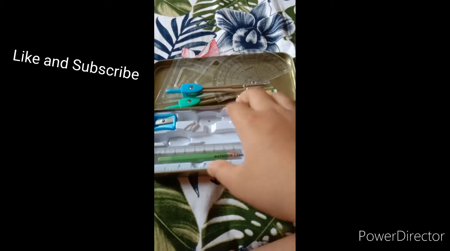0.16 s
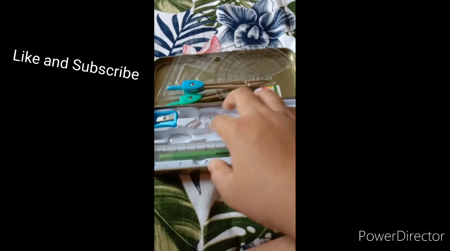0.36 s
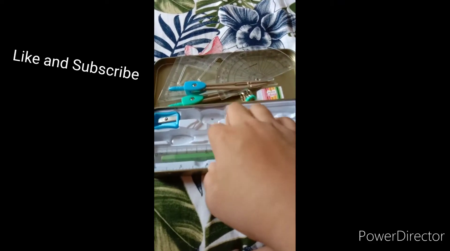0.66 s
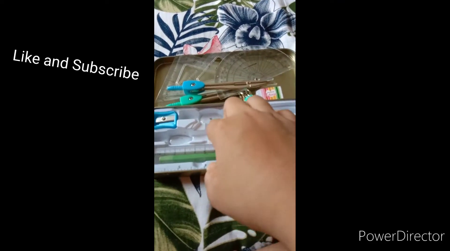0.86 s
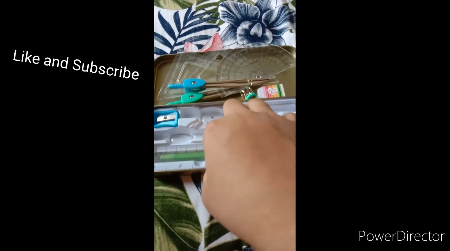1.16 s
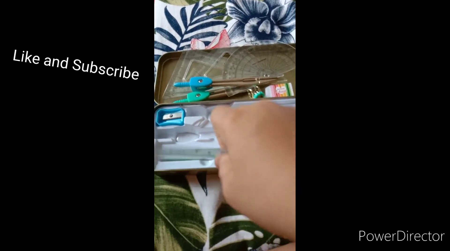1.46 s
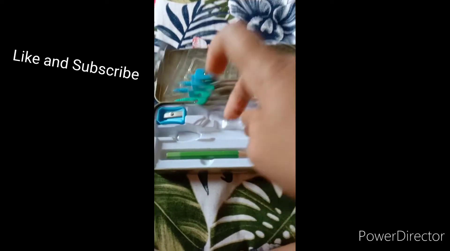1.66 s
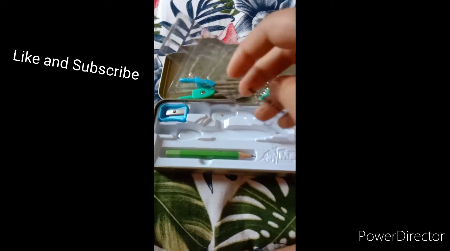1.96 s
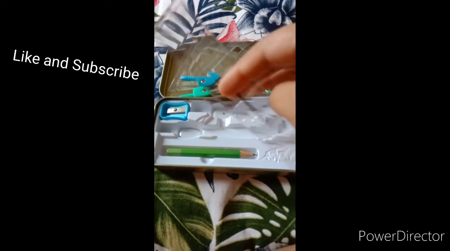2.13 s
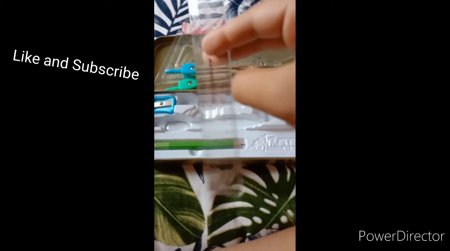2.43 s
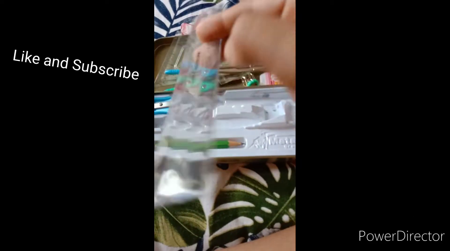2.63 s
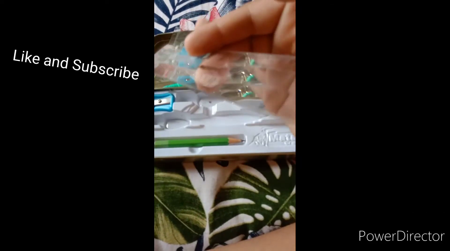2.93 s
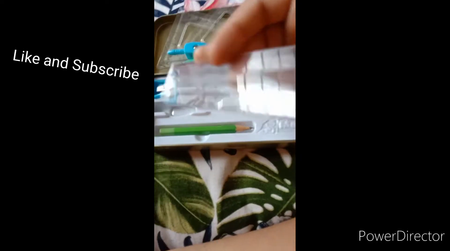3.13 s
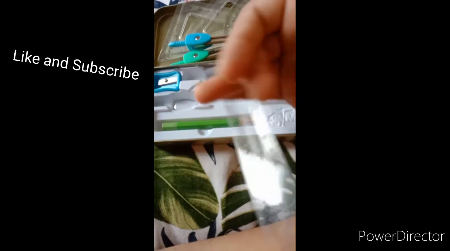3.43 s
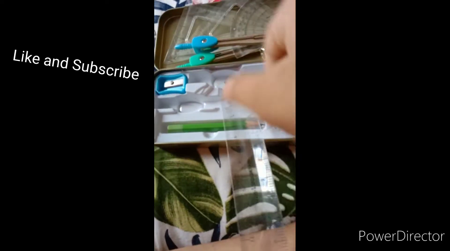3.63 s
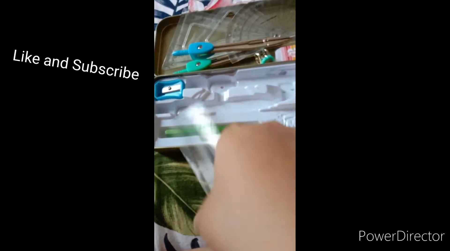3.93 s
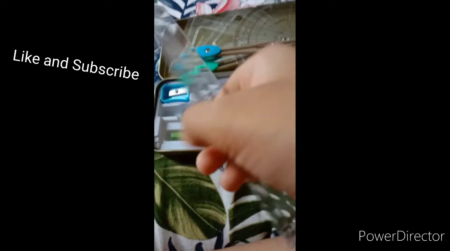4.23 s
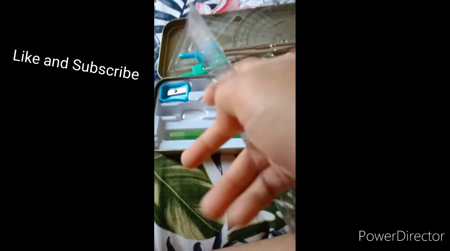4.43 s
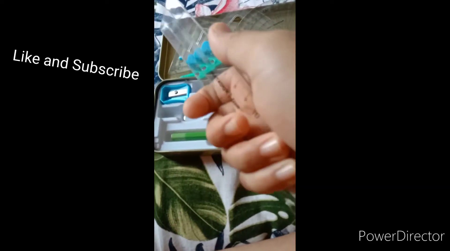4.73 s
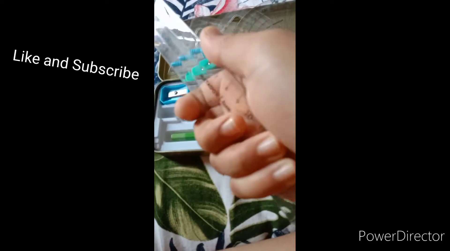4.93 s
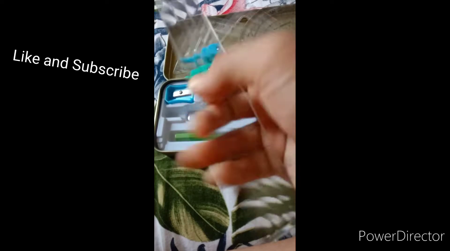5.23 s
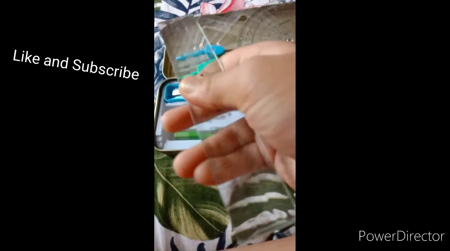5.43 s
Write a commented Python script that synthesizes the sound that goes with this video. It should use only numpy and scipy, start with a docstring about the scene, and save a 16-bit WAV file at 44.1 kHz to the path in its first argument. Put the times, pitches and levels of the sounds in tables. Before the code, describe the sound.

A plastic ruler is handled in a metal tin indoors, making scattered clicks, snaps and hissy rubs right by the microphone. It snaps loose from its tray early on, taps once, then clatters and scrapes in a louder burst, ending with a few soft ticks. Moving air thumps softly on the microphone, mostly in the first two thirds. Behind it, a quiet room drone wavers and faint far-off horns sound briefly.

```python
"""A plastic ruler snaps, taps and rubs as fingers pry it from the moulded tray of a metal tin and turn
it over close to a phone. Each contact is a brief force that excites the damped modes of ruler, tray
and tin; stick-slip friction on skin and tray drives the same modes more gently. Moving air buffets
the microphone, over a wavering room drone and faint far-off horn tones."""
import sys
import numpy as np
from scipy import signal
from scipy.io import wavfile
from scipy.ndimage import uniform_filter1d

SR = 44100
rng = np.random.default_rng(int(sys.argv[2]) if len(sys.argv) > 2 else 0)


def materialize(psi):
    """Save the field psi as 16-bit PCM at rate SR to the path in sys.argv[1].

    A 1-D psi becomes a single channel; in a 2-D psi each row is a channel.
    """
    bounded = np.clip(np.atleast_2d(psi).T, -1, 1)
    quanta = np.round(bounded * 32767).astype(np.int16)
    wavfile.write(sys.argv[1], SR, quanta)


N = 246519


def amp(db):
    """Decibels to amplitude ratio."""
    return 10 ** (np.asarray(db) / 20)


def unit_rms(x):
    """Normalisation to unit power."""
    return x / np.sqrt(np.mean(x ** 2) + 1e-20)


def smooth(x, samples):
    """Two moving averages in cascade: a low-pass filter."""
    return uniform_filter1d(uniform_filter1d(x, samples), samples)


def wander(samples):
    """Low-passed noise of unit power: a slow random modulator."""
    return unit_rms(smooth(rng.standard_normal(N), samples))


def at_frequency(rows, hz):
    """Interpolation on a logarithmic frequency axis."""
    row_hz, value = np.transpose(rows)
    return np.interp(np.log(hz + 1), np.log(row_hz + 1), value)


def over_time(rows):
    """Linear interpolation at every sample."""
    return np.interp(np.arange(N) / SR, *np.transpose(rows))


def add(mix, start_s, sound):
    """Superposition of a sound on the mix."""
    part = mix[round(start_s * SR):][:len(sound)]
    part += sound[:len(part)]


def swells(rows, skew):
    """Sum of bell-shaped envelopes; a skew under 1 peaks early and fades slowly."""
    envelope = np.zeros(N)
    for middle_s, length_s, level_db in rows:
        progress = np.arange(round(length_s * SR)) / (length_s * SR)
        bell = np.sin(np.pi * progress ** skew) ** 2
        add(envelope, max(middle_s - length_s / 2, 0), amp(level_db) * bell)
    return envelope


def shape_spectrum(x, spectrum):
    """Minimum-phase filter of unit energy with the given spectrum."""
    hz = np.abs(np.fft.fftfreq(4096, 1 / SR))
    inside = (hz > spectrum[0][0]) & (hz < spectrum[-1][0])
    log_gain = np.where(inside, np.maximum(at_frequency(spectrum, hz), -70), -70) * np.log(10) / 20
    response = np.fft.ifft(np.exp(np.conj(signal.hilbert(log_gain)))).real[:2048]
    return signal.oaconvolve(x, response / np.linalg.norm(response))[:len(x)]


def patchy_noise(spectrum, fft_size, depth_db, frames, bins):
    """Coloured noise of unit power, modulated in random patches of time and frequency."""
    hz = np.fft.rfftfreq(fft_size, 1 / SR)
    real, imag, patches = rng.standard_normal((4 * N // fft_size + 5, len(hz), 3)).T
    patches = unit_rms(uniform_filter1d(uniform_filter1d(patches, bins, 0), frames, 1))
    patches = unit_rms(patches - uniform_filter1d(patches, 4 * bins, 0))  # broad bands stay level
    outside = (hz < spectrum[0][0]) | (hz > spectrum[-1][0])
    level_db = at_frequency(spectrum, hz) - 80 * outside
    spectra = (real + 1j * imag) * amp(level_db[:, None] + depth_db * patches)
    return unit_rms(signal.istft(spectra, nperseg=fft_size, noverlap=3 * fft_size // 4)[1][:N])


def resonate(x, hz, width_hz):
    """Forced response of a damped oscillator, with unit gain at resonance."""
    phasor = np.exp(2j * np.pi * hz * np.arange(len(x)) / SR)
    pole = np.exp(-np.pi * width_hz / SR)
    return 2 * (phasor * signal.lfilter([1 - pole], [1, -pole], x / phasor)).real


def modal_sum(x, modes, tuning=1, uneven_db=0):
    """Modal superposition, two resonators in cascade per mode; the contact point varies gain and pitch."""
    place, detune = rng.standard_normal((2, len(modes)))
    place_db = uneven_db * (place - place.mean())
    ratios = tuning * (1 + 0.018 * (uneven_db > 0) * detune)
    return sum(amp(db + offset_db) * resonate(resonate(x, hz * ratio, width), hz * ratio, width)
               for (hz, width, db), offset_db, ratio in zip(modes, place_db, ratios))


# Spectrum of the room drone: frequency_hz, relative_density_db
DRONE_SPECTRUM = [(100, -40), (170, -21.5), (353, -14.5), (555, -19), (690, -3), (830, -4.5), (996, -23.5),
                  (1310, -18.5), (2070, -37), (3530, -35.5), (3760, -39), (3950, -49.5), (6530, -42.5),
                  (8200, -60.5), (10700, -94), (18000, -120)]
# Envelope of the drone: time_s, relative_level_db
DRONE_LEVELS = [(0.0, -57.5), (0.11, -47.5), (0.4, -52.5), (0.87, -49), (2.02, -47), (2.19, -50),
                (3.33, -51.5), (3.56, -41.5), (4.0, -50.5), (4.3, -46.5), (4.8, -53.5), (5.59, -49.5)]
# Noise bands of a low boom and a thin hiss: centre_hz, width_hz, level_db
BOOM_BAND = (302.5, 89, -61)
HISS_BAND = (8780, 250, -86)


def room():
    """Amplitude-modulated noise: drone and boom waver over a steady hiss and microphone noise."""
    drone = patchy_noise(DRONE_SPECTRUM, fft_size=1024, depth_db=5, frames=10, bins=3)
    drone *= amp(4.5 + over_time(DRONE_LEVELS))
    boom_swell = amp(5.7 * wander(4000))
    boom, hiss = (amp(band[2]) * unit_rms(modal_sum(rng.standard_normal(N), [band]))
                  for band in (BOOM_BAND, HISS_BAND))
    drone_waver = amp(3.03 * wander(2500))
    return drone_waver * drone + boom_swell * boom + hiss + amp(-87) * rng.standard_normal(N)


# Far-off horn tones: start_s, length_s, pitch_hz, level_db
HORN_TONES = [(0, 0.13, 3324, -64.5), (0, 0.14, 3830, -66.5), (2.307, 0.4, 3700, -70.5),
              (3.135, 0.12, 3300, -64), (3.118, 0.17, 3794, -67.5), (3.655, 0.251, 3162, -54),
              (4.13, 0.16, 3275, -62.5), (4.438, 0.13, 2934, -69), (4.505, 0.12, 2020, -70.5),
              (4.707, 0.093, 3027, -69), (5.459, 0.128, 3385, -69), (5.513, 0.17, 2473, -61)]


def horns():
    """Only single overtones carry this far; each wavers as it beats with narrow-band noise."""
    out = np.zeros(N)
    for start_s, length_s, pitch_hz, level_db in HORN_TONES:
        t = np.arange(round(length_s * SR)) / SR
        fuzz = unit_rms(resonate(rng.standard_normal(len(t)), pitch_hz, width_hz=30))
        tone = np.sqrt(2) * np.sin(2 * np.pi * pitch_hz * t) + 0.7 * fuzz
        add(out, start_s, amp(level_db) * tone * signal.windows.tukey(len(t), 0.5))
    return out


# Spectrum of air buffeting the microphone: frequency_hz, relative_density_db
BUFFET_SPECTRUM = [(13, -60), (32, -25.5), (67, 1.5), (92, 8), (188, -11.5), (312, -22.5), (450, -35.5),
                   (990, -120)]
# Light draught between puffs: time_s, level_db
DRAUGHT_LEVELS = [(0, -59), (.4, -49.5), (1.1, -48), (1.5, -62), (3, -52), (3.5, -63), (4.1, -59.5),
                  (4.6, -68.5), (5.59, -70.5)]
# Strong puffs: middle_s, length_s, level_db
AIR_PUFFS = [(.52, 0.089, -34.5), (.62, 0.03, -22.5), (.83, 0.069, -31), (.97, 0.095, -21.5),
             (1.14, 0.14, -27.5), (1.8, 0.18, -40), (2.17, 0.19, -45), (2.55, 0.076, -33),
             (2.64, 0.098, -28.5), (2.74, 0.22, -32.5), (3.2, 0.094, -41.5), (3.66, 0.13, -34),
             (3.75, 0.11, -25), (3.85, 0.59, -41), (5.08, 0.19, -49), (5.42, 0.32, -40)]
GUST_DB, GUST_S = 4, 0.018  # depth and time scale of the draught's wandering


def air_buffeting():
    """Turbulent pressure at the microphone: low noise carried by a draught and by puffs."""
    flutter = patchy_noise(BUFFET_SPECTRUM, fft_size=2048, depth_db=5.5, frames=3, bins=3)
    flutter /= np.sqrt(smooth(flutter ** 2, 1300) + 0.048)  # evens out the short-term power
    draught = amp(over_time(DRAUGHT_LEVELS) + GUST_DB * wander(int(GUST_S * SR)))
    return (draught + swells(AIR_PUFFS, skew=0.96)) * flutter


# Decay of tin and room after a contact: frequency_hz, t60_s
DECAY_TIMES = [(700, 0.15), (1300, 0.2), (3000, 0.14), (6000, 0.068), (14000, 0.023)]


def reverberation(direct):
    """Sparse reflections of random sign decay exponentially, each band at its own rate."""
    hollow = resonate(direct, 1250, width_hz=270)
    reflected = direct - (1 - amp(-12)) * hollow  # the tray's knock is thrown back less
    echoes = np.zeros(SR // 2)
    arrivals = np.arange(200, len(echoes) - 20, 20)
    arrivals += rng.integers(0, 20, len(arrivals))
    echoes[arrivals] = rng.choice([-1., 1.], arrivals.shape)
    hz, t, spectra = signal.stft(echoes, SR, nperseg=256)
    decay = amp(-60 * t / at_frequency(DECAY_TIMES, hz)[:, None])
    tail = signal.istft(spectra * decay, SR, nperseg=256)[1]
    return signal.fftconvolve(reflected, tail / np.linalg.norm(tail))[:N]


# Modes of the tin's thin walls: pitch_hz, gain_db
WALL_MODES = [(2213, -10), (2700, -7), (3289, -6.5), (4786, -10.5), (5173, -14.5), (5443, -13.5),
              (6099, -9.5), (7058, -11.5)]


def tin_walls(direct):
    """Sympathetic resonance: the lightly damped walls ring on after each contact."""
    return sum(amp(db) * resonate(direct, hz, width_hz=9.5) for hz, db in WALL_MODES)


# Modes of tin, tray, bending ruler and ruler's edge: nominal_pitch_hz, width_hz, relative_gain_db
TIN_MODES = [(346, 87, -6.5), (444, 76, -3), (617, 220, 2)]
TRAY_MODES = [(1038, 460, -2), (1225.5, 252, 3.5), (1307, 150, -3.5)]
BENDING_MODES = [(2433, 220, 3.5), (2750, 300, -3.5), (3284, 250, 2.5), (3845, 130, 0.5)]
EDGE_MODES = [(4870, 290, 1), (5100, 300, 7.5), (5913, 320, 7.5), (5950, 260, 5), (6870, 230, 2.5),
              (7576, 200, -3), (9560, 200, -12)]
# Air under the tray, which makes the knock swell in: pitch_hz, width_hz
TRAY_CAVITY = (1210, 330)


def ruler_and_tin(thud, knock, clack, snap, tuning=1, uneven_db=0):
    """Forced vibration: four forces drive four sets of modes; tin and tray are too soft to pass treble."""
    tin = amp(19.5) * modal_sum(thud, TIN_MODES, 0.98, uneven_db)
    tray = amp(20.5) * modal_sum(resonate(knock, *TRAY_CAVITY), TRAY_MODES)
    bending = amp(15) * modal_sum(clack, BENDING_MODES, tuning, uneven_db)
    edge = amp(4.5) * modal_sum(snap, EDGE_MODES, tuning, uneven_db)
    low_pass = signal.butter(3, 2000, fs=SR)
    return signal.lfilter(*low_pass, tin + tray) + bending + edge


# Treble sizzle of rubs and taps: frequency_hz, relative_density_db
SIZZLE_SPECTRUM = [(5000, -18), (8500, -1), (11500, -5.5), (12400, -2), (12900, -9), (15000, 5.5),
                   (15700, -16.5), (16700, -46)]
# Strokes of the ruler on skin and tray: middle_s, length_s, level_db, sizzle_offset_db
RUB_STROKES = [(0.614, 0.053, -54, -13), (1.557, 0.25, -48.5, -10), (1.732, 0.054, -52.5, -9),
               (1.805, 0.36, -61, -23), (1.993, 0.073, -65, -1), (2.291, 0.13, -58, -1),
               (3.498, 0.13, -44.5, -3.5), (3.614, 0.11, -38.5, 0.5), (3.716, 0.34, -52, -18),
               (4.041, 0.075, -68.5, 9), (4.14, 0.15, -55.5, -7), (4.254, 0.052, -57.5, 0),
               (4.666, 0.04, -62, -18.5), (5.364, 0.14, -63, -13.5)]


def ruler_rubs():
    """Stick-slip friction: 2 ms slips of random strength excite the modes under a treble sizzle."""
    slip_db = 2.5 * np.minimum(rng.exponential(1, N // 90 + 1), 3.5)
    slips = unit_rms(amp(slip_db)).repeat(90)[:N]
    force_gains = amp([[-12], [-12], [-9], [4]])  # thud, knock, clack, snap
    skew = 0.59
    out = np.zeros(N)
    for middle_s, length_s, level_db, _ in RUB_STROKES:
        start = round((middle_s - length_s / 2) * SR)
        stroke = (slips * swells([(middle_s, length_s, level_db)], skew))[start:start + SR // 2]
        forces = rng.standard_normal((4, SR // 2))[:, :len(stroke)] * stroke * force_gains
        add(out, start / SR, ruler_and_tin(*forces, uneven_db=0.5))
    sizzle_rows = [(middle_s, length_s, db + offset) for middle_s, length_s, db, offset in RUB_STROKES]
    sizzle = patchy_noise(SIZZLE_SPECTRUM, fft_size=256, depth_db=9.5, frames=10, bins=6)
    return out + swells(sizzle_rows, skew) * slips * sizzle


# Taps and snaps of the ruler; offsets count from edge_db, and the grip sets the pitch ratio:
# start_s, edge_db, knock_db, sizzle_offset_db, pitch_ratio, contact_ms, bending_offset_db
RULER_CONTACTS = [(0.5714, -24.5, -22, -15, 0.99, 1.09, -7), (0.5788, -32.5, -28, -23, 0.9, 1.17, 0),
                  (0.5884, -26, -23, -28, 1.03, 1.2, -4.5), (0.8302, -46, -47, -12.5, 0.91, 1.5, -10),
                  (0.9114, -68, -33.5, -39, 0.79, 1.85, -9), (1.2424, -37, -43, -31, 1.01, 1.97, -8),
                  (1.2583, -45.5, -30, -26, 0.95, 1.83, -10), (1.4013, -40.5, -54, -24, 0.88, 0.74, -13.5),
                  (1.4416, -37, -44, -10.5, 0.9, 1, -14.5), (1.455, -17.5, -20, -11.5, 0.85, 1.95, -10.5),
                  (1.4755, -8, -12.5, -15, 0.98, 1.14, -11), (1.5008, -17, -18.5, -19.5, 0.96, 1.22, -13),
                  (1.6213, -32, -46, -12, 1, 1.61, -16), (2.2402, -17.5, -35, -25, 0.93, 1.16, -14.5),
                  (2.2441, -20.5, -33.5, -10, 1.07, 1.7, -9.5), (3.3493, -54, -61, -16, 1.13, 3, -13.5),
                  (3.439, -11.5, -4, -16, 0.93, 1.13, -7), (3.5338, -7.5, -13, -13, 0.9, 1.06, -7.5),
                  (3.537, -34, -19.5, -8, 1.1, 1.68, -3.5), (3.5481, -17, -18.5, -16, 1.2, 1.04, -13),
                  (3.5648, -12, -18, -8.5, 0.99, 1.14, -9), (3.571, -23, -19.5, -15, 1.063, 5.3, -5),
                  (3.6099, -26.5, -32.5, -3.5, 0.83, 1.4, -1.5),
                  (3.6587, -33.5, -30.5, -12.5, 1.02, 2.03, -5), (3.7396, -22, -44, -13.5, 1.01, 1.3, -10),
                  (4.0922, -22, -24.5, -22, 1.01, 1.38, 0), (4.0998, -34, -18, -11, 1.7, 1.27, -12),
                  (4.118, -29.5, -30.5, -8.5, 0.94, 2.1, -5), (4.4222, -28, -83, -24, 0.99, 1.02, -41.5),
                  (5.324, -42.5, -75, -31.5, 1.016, 2.05, -19), (5.35, -47.5, -78, -12, 1, 2.7, -32)]
BLOW_SHARE = 0.6  # share of a short contact that tin and tray feel as one blow
RATTLE_DB, RATTLE_DECAY_MS = -20, 9  # the loose ruler rattles on after each contact


def ruler_taps():
    """Impact excitation: each contact is an impulse within a burst of chatter, followed by a rattle."""
    out = np.zeros(N)
    t_ms = np.arange(3000) / SR * 1000
    for start_s, edge_db, knock_db, sizzle_db, pitch_ratio, contact_ms, bending_db in RULER_CONTACTS:
        progress = t_ms / (1.443 * contact_ms)
        push = (progress * np.exp(1 - progress)) ** 2
        strength = np.linalg.norm(push)
        forces = rng.standard_normal((5, len(t_ms))) * push  # thud, knock, clack, snap, sizzle
        forces *= strength / np.linalg.norm(forces, axis=1)[:, None]
        blow = strength * (np.arange(len(t_ms)) == np.argmax(push))
        share = BLOW_SHARE * min(2 / contact_ms, 1) ** 2  # long contacts grind rather than strike
        forces[:2] = (1 - share) * forces[:2] + share * blow
        forces[2:4] = (1 - share / 2) * forces[2:4] + share / 2 * blow
        rattle = amp(RATTLE_DB) * np.minimum(progress, 1) * np.exp(-t_ms / RATTLE_DECAY_MS)
        forces[2:] += rattle * rng.standard_normal((3, len(t_ms)))
        forces[:4] *= amp([[knock_db - 7], [knock_db], [edge_db + bending_db], [edge_db]])
        tuning = np.clip(pitch_ratio, 0.8, 1.25)
        add(out, start_s, ruler_and_tin(*forces[:4], tuning, uneven_db=1.5))
        add(out, start_s, amp(edge_db + sizzle_db) * shape_spectrum(forces[4], SIZZLE_SPECTRUM))
    return out


def scene():
    """Superposition of direct sound, ringing, reflections and background at one microphone."""
    direct = ruler_taps() + ruler_rubs()
    ruler = direct + tin_walls(direct) + amp(-10.5) * reverberation(direct)
    return (ruler + air_buffeting() + room() + horns())[None]


def record(dry):
    """Soft saturation rounds the loudest blows; the phone then limits the bandwidth."""
    saturated = 1.1 * np.tanh(dry / 1.1)
    low_pass = signal.firwin(511, cutoff=16750, window=("kaiser", 9), fs=SR)
    return signal.oaconvolve(saturated, low_pass[None], "same")


dry = scene()
out = record(dry)
materialize(out)
```